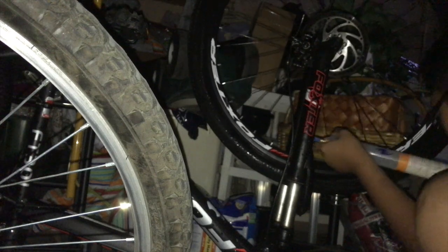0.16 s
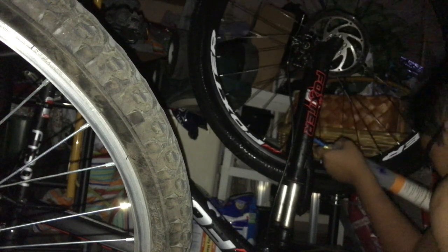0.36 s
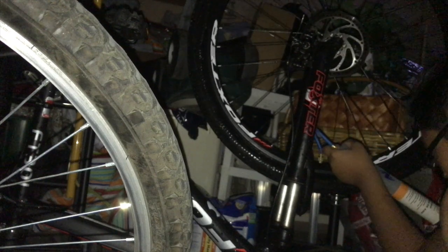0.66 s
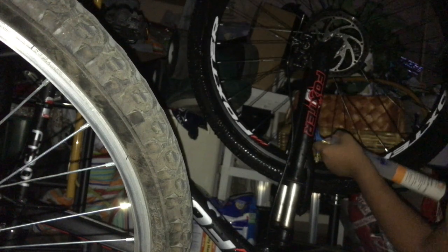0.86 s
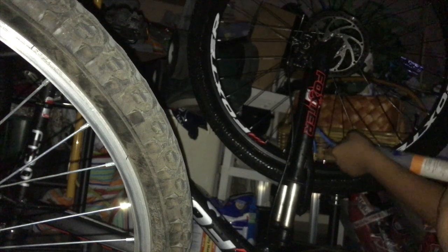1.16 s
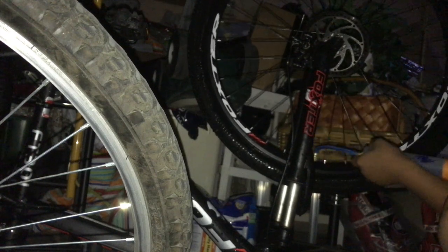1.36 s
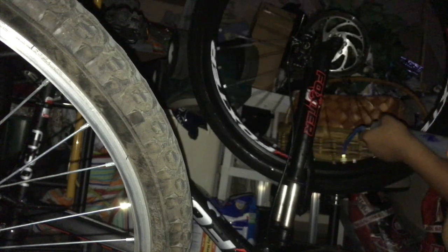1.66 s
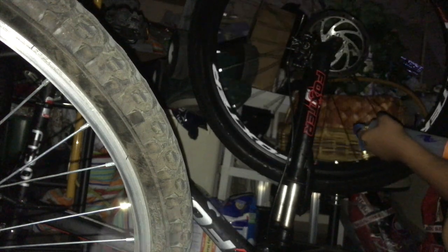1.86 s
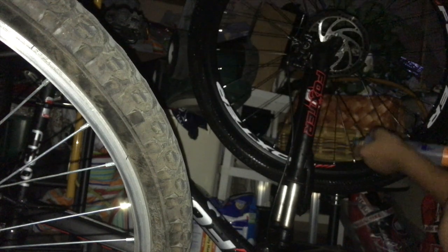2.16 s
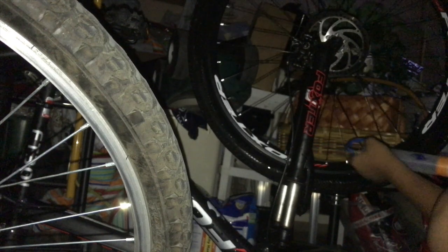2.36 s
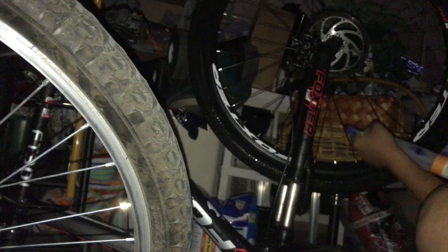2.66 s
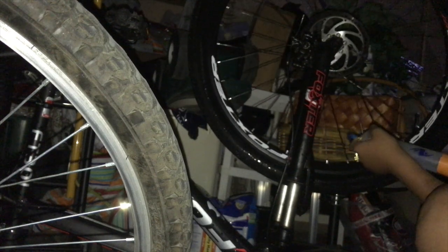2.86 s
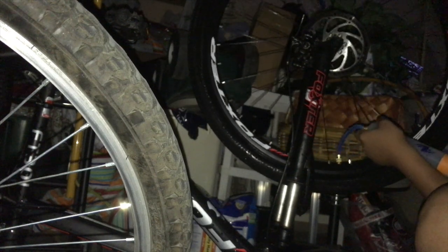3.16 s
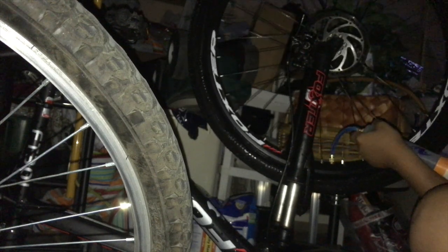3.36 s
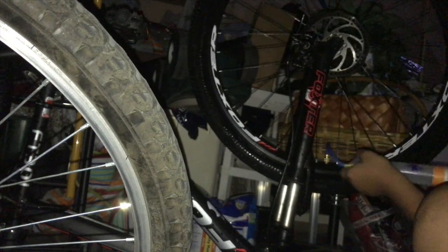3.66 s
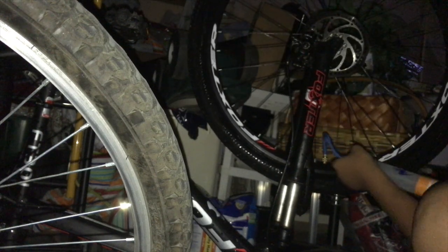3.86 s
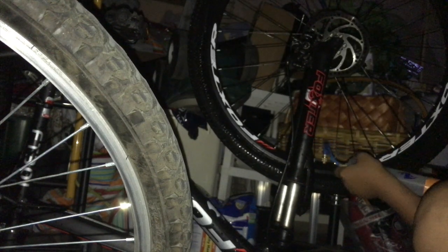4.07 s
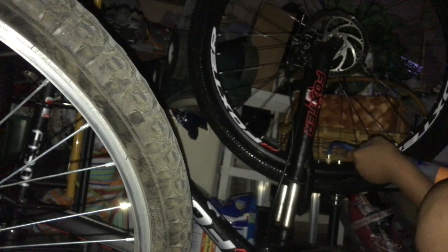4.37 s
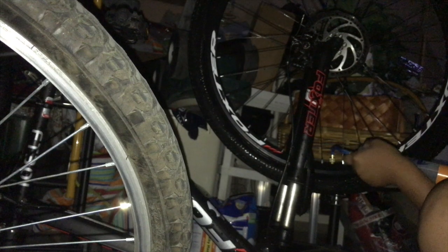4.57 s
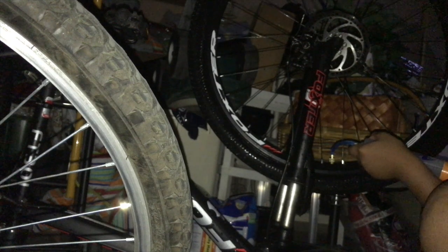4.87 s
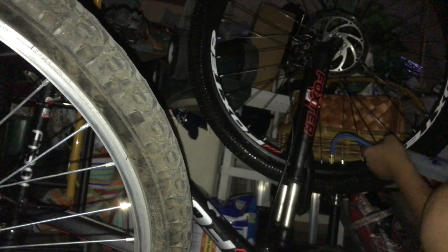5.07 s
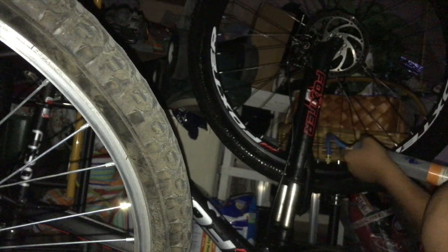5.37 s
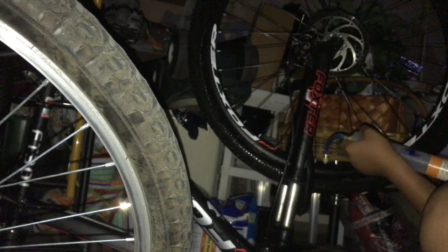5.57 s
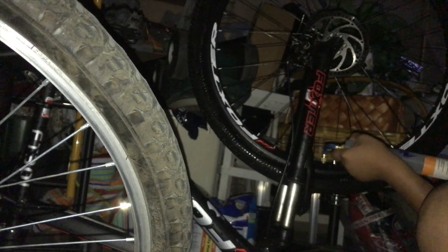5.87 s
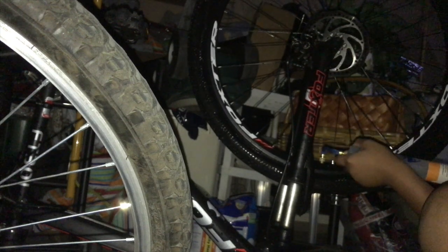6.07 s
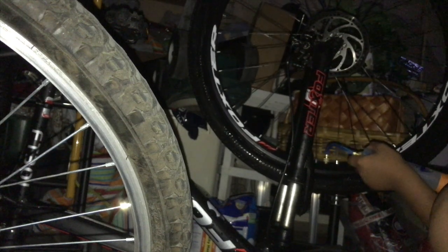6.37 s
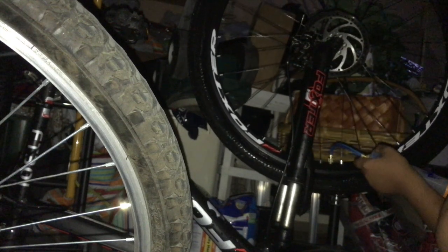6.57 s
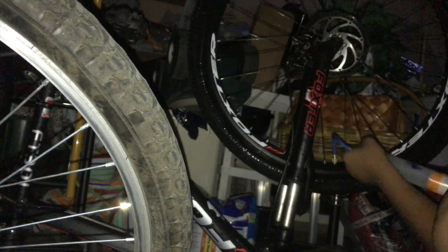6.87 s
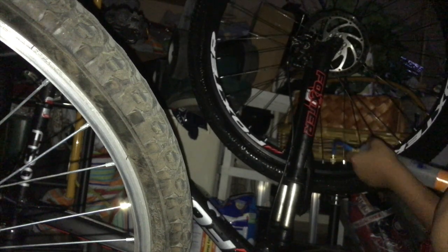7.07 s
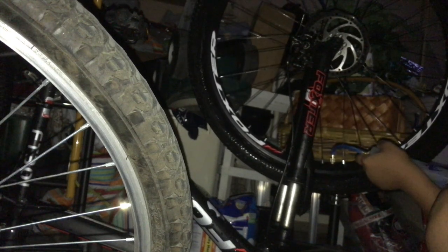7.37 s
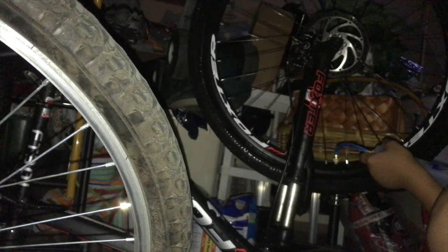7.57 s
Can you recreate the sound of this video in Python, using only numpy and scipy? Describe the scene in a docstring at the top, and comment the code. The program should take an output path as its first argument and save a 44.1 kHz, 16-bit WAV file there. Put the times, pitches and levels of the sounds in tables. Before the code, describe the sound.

Short spurts of air and sharp piston clacks come from a bicycle hand pump in a garage, separated by soft hissing pulls.

```python
"""A hand pump feeds a bicycle tyre in a garage, over a low rumble. First comes a quick push: air rushes
down the hose, forces the valve open in spurts, and the piston clacks against the metal barrel. Then a
slow pull sips air with a faint hiss, hand and hose rustle and tick, and one puff of air buffets the
microphone. Four more pushes follow, of three or four spurts each and mostly ending in a clack, with
slow pulls between them and one more to finish."""
import sys
import numpy as np
from scipy import signal
from scipy.fft import rfft, irfft, next_fast_len
from scipy.io import wavfile
from scipy.ndimage import map_coordinates

SR = 44100
rng = np.random.default_rng(int(sys.argv[2]) if len(sys.argv) > 2 else 0)


def master_out(mix):
    """Clip the mix to full scale and print it as 16-bit PCM to the path in sys.argv[1]."""
    frames = np.transpose(np.atleast_2d(mix))
    ceiling = np.clip(frames, -1, 1)
    pcm = np.round(ceiling * 32767).astype(np.int16)
    wavfile.write(sys.argv[1], SR, pcm)


N = 340887
AGE = np.arange(SR // 8) / SR  # seconds since a short sound began

# pushes on the handle: t/s, length/s, level/dB
PUSH_STROKES = [(-.05, 0.092, -36.5), (2.513, 0.095, -41.5), (3.867, 0.11, -42), (5.212, .092, -37),
                (6.885, 0.094, -39.5)]
# spurts of air through the valve: t/s, level/dB
VALVE_SPURTS = [(.0074, -23.5), (.029, -25), (2.5143, -22.5), (2.5481, -23.5), (2.5759, -20.5),
                (3.8731, -24.5), (3.9009, -21.5), (3.929, -24.5), (5.2121, -21), (5.235, -21.5),
                (5.2547, -23), (5.277, -24), (6.8799, -22), (6.9088, -22), (6.9353, -24)]
# the piston hits its stop: t/s, level/dB, knock against scrape/dB, t60/s (time to fade by 60 dB)
PISTON_CLACKS = [(0.0613, -26.5, -6, .04), (0.0826, -22.5, -7, 0.069), (0.0864, -18, -13.5, 0.041),
                 (2.6164, -23, -8, .032), (2.628, -16.5, -9, .026), (3.1785, -48.5, -10, .015),
                 (3.621, -39, -19, 0.038), (3.826, -34, -18, .01), (4.076, -36.5, -20, 0.011),
                 (5.3193, -27, -12, 0.057), (5.334, -22.5, -2.5, .031), (6.9845, -28.5, 6, 0.013),
                 (6.992, -23, -15, 0.012), (6.9958, -19, -8, 0.039)]
# the piston is drawn back: start t/s, end t/s, level/dB, change on the way/dB, slide against hiss/dB
PULL_STROKES = [(.2, .35, -63, 9, -13), (1.41, 2.15, -63.5, -3, -6), (2.805, 3.614, -58, -4, -9),
                (4.33, 5.008, -59, -2.5, -15), (5.545, 6.2, -56.5, 0.5, -20), (7.253, 7.73, -60, -11, -17)]
# hand and rod slide as the grip shifts or the stroke turns: t/s, length/s, level/dB
HAND_RUBS = [(0.203, .14, -51), (0.935, 0.0045, -52.5), (1.023, 0.011, -60), (1.323, 0.071, -55),
             (1.557, 0.23, -64.5), (2.151, .012, -53), (2.77, .08, -53), (4.078, 0.13, -57.5),
             (5.118, 0.091, -55), (5.475, 0.077, -51), (6.712, 0.0089, -51), (7.16, 0.11, -57.5)]
# hose, nozzle and grip tick against the wheel: t/s, level/dB, extra treble/dB, ring f/Hz
WHEEL_TICKS = [(.628, -50.5, -3, 3600), (0.9256, -48.5, -11, 1450), (1.3972, -45.5, -12.5, 2030),
               (1.4106, -38.5, -7, 3660), (1.4274, -46, -14.5, 2380), (1.4526, -43.5, -7.5, 4450),
               (2.1465, -47, -20, 810), (2.3498, -31, -24, 2520), (2.4783, -41.5, -22, 2650),
               (2.4973, -35.5, -19, 2550), (2.762, -47, -23, 2900), (3.8044, -45.5, -10, 1700),
               (4.2546, -50, -17, 1200), (4.3206, -52, 0.5, 3750), (5.1362, -46.5, -4, 3400),
               (5.4705, -46.5, -13, 3000), (5.9607, -54, -6, 4080), (6.0092, -55, -12, 4040),
               (6.5437, -51, -7.5, 3800), (6.5853, -50, -0.5, 3600), (6.7075, -46, -16, 1400),
               (7.1736, -44, -14.5, 1970), (7.332, -53.5, -6, 1240)]
# gusts of the puff reach the microphone: t/s, length/s, buffet/dB, flutter/dB, hiss/dB
PUFF_GUSTS = [(.351, .075, -23, -31, -34.5), (0.49, 0.019, -19.5, -30.5, -67),
              (0.661, 0.016, -36, -40.5, -52.5)]
# the air settles after the gusts: start t/s, end t/s, level/dB, change on the way/dB
PUFF_WAKE = (0.61, 1.44, -38, -10)

# the notes at which things ring: f/Hz, width/Hz, relative level/dB
HOSE_MODES = [(237, 15, -5), (466, 21, -23), (1580, 80, -13), (1900, 160, -4), (2490, 100, -10),
              (3680, 83, -2.5), (4280, 44, 0), (4450, 110, -2), (5600, 140, -1.5)]  # the air in hose and nozzle
BARREL_MODES = [(2700, 110, -14), (5572, 60, 0), (6423, 60, 1.5), (7150, 80, -5), (8699, 55, -2),
                (9100, 80, -5.5), (9991, 60, -3), (10956, 90, -6), (12950, 110, -7)]  # the thin metal tube

# the tone colour of each noise: f/Hz, relative level/dB
ROOM_RUMBLE = [(20, -44.5), (33, -11), (45, -17), (57, 2), (68, -7.5), (80, -0.5), (115, -14), (143, -13.5),
               (190, -24.5), (220, -22), (290, -27.5), (380, -26.5), (520, -49), (1000, -92.5)]
ROOM_HISS = [(200, -8.5), (450, -5), (700, -3.5), (1000, -6.5), (1800, -11), (4000, -12.5), (7800, -15),
             (10300, -19), (13000, -16), (16000, -16.5)]
HOSE_RUSH = [(100, -35), (210, 1), (450, -18), (950, 2), (1700, 1.5), (2800, -4), (5500, -10.5),
             (7500, -11), (16000, -29)]
VALVE_GUSH = [(100, -40), (210, -26), (400, -26.5), (900, -11.5), (1600, -10.5), (2450, -2), (3000, -3),
              (3700, -2), (5100, -6), (5900, -5), (7000, -14), (9000, -19), (16000, -38)]
BRIGHT_SPIT = [(3000, -30), (7000, -4), (9300, -5.5), (10500, -7.5), (16000, -11.5)]
PISTON_SCRAPE = [(1500, -27), (4900, -29), (5500, -1.5), (7100, 5), (7700, -2), (8800, 4.5), (10000, 2),
                 (10600, -2), (12000, 3.5), (15500, -7)]
HANDLE_KNOCK = [(100, -14), (300, -10.5), (600, -17), (1500, 2.5), (2200, -2), (2800, 4), (4000, 3),
                (5500, 1), (9000, -13)]
SEAL_HISS = [(1000, -22), (2800, -9), (3600, 1.5), (4900, -12.5), (6700, -3), (8000, -8), (9000, -1),
             (9800, -3.5), (10400, -6.5), (11300, -0.5), (12700, -1), (14500, -5), (16000, -15)]
WASHER_SLIDE = [(300, -18), (700, 1), (1100, 0), (2200, 1), (4000, -18.5)]
HAND_RUSTLE = [(150, 1.5), (700, 1.5), (1500, 2), (3500, -2.5), (6000, -4), (10000, -9.5), (16000, -24)]
TICK_SCUFF = [(150, -30), (700, 2), (1300, -10.5), (2600, -3), (3600, -4.5), (5500, -10.5), (8000, -22),
              (16000, -49)]
PUFF_BUFFET = [(15, -45), (25, -44.5), (42, -9), (55, -2.5), (75, 3), (100, -7), (150, -8), (205, -6.5),
               (260, -18), (320, -15.5), (420, -22.5), (550, -33.5), (1000, -58)]
PUFF_FLUTTER = [(200, -29), (300, 5.5), (420, 2), (600, -1.5), (850, 0.5), (1150, -3.5), (1800, -11.5),
                (3000, -18.5), (8000, -33)]
PUFF_HISS = [(1000, -23), (2500, 2.5), (4000, 3.5), (7000, 1), (15000, -12)]

# how long the garage echoes: f/Hz, t60/s
ECHO_TIMES = [(200, 0.14), (1500, 0.23), (5000, 0.29), (10000, 0.26), (16000, 0.26)]


def amp(db):
    """Turn decibels into a gain."""
    return 10 ** (np.asarray(db) / 20)


def unit(x):
    """Scale a sound to an average power of 1."""
    return x / np.sqrt(np.mean(x ** 2) + 1e-20)


def along(points, hz):
    """Read between the rows of a (frequency, value) table, on a log frequency axis."""
    freqs, values = np.transpose(points)
    return np.interp(np.log(hz + 1), np.log(freqs + 1), values)


def swell(start, end, db, attack, release, change_db=0):
    """A gain that rises until start, drifts by change_db until end, then dies away (times in seconds)."""
    t = np.arange(N) / SR
    progress = np.clip((t - start) / max(end - start, 1 / SR), 0, 1)
    fades = np.exp(-np.maximum(start - t, 0) / attack - np.maximum(t - end, 0) / release)
    return amp(db + change_db * progress) * fades


def wobble(rate):
    """A smooth curve through rate random points a second."""
    points = rng.standard_normal(int(N * rate / SR) + 4)
    return map_coordinates(points, [np.arange(N) * rate / SR])


def filtered(x, response):
    """Scale each frequency in x by the gain response(hz)."""
    size = next_fast_len(len(x) + 8192)
    return irfft(rfft(x, size) * response(np.fft.rfftfreq(size, 1 / SR)), size)[:len(x)]


def noise(spectrum, size=N):
    """Noise with the given tone colour and a power of 1."""
    return unit(filtered(rng.standard_normal(size), lambda hz: amp(along(spectrum, hz))))


def burst(spectrum):
    """A short stretch of coloured noise."""
    return noise(spectrum, size=len(AGE))


def strike(rise, t60):
    """A gain that climbs to 1 in rise seconds, then falls 60 dB every t60 seconds."""
    return np.minimum(AGE / rise, 1) * amp(-60 * np.maximum(AGE - rise, 0) / t60)


def resonate(x, modes, grip_hz=0):
    """Make x ring at the given notes; the hand's grip widens each one, so it dies sooner."""
    ring = 0
    for hz, width_hz, db in modes:
        width = width_hz + grip_hz
        ring += amp(db) * width * np.exp(-np.pi * width * AGE) * np.sin(2 * np.pi * hz * AGE)
    return signal.fftconvolve(x, ring / np.linalg.norm(ring))[:len(x)]


def noise_band(hz, width_hz):
    """Noise gathered around one pitch."""
    return resonate(rng.standard_normal(N), [(hz, width_hz, 0)])


def add(track, start, sound):
    """Mix a sound into the track, start seconds in."""
    part = track[max(round(start * SR), 0):][:len(sound)]
    part += sound[:len(part)]


def garage(x, echo_db):
    """Add the echo of the cluttered room, a little different each time."""
    hz, t, spectrum = signal.stft(rng.standard_normal(SR // 2), SR, nperseg=256)
    decay = amp(-60 * t / along(ECHO_TIMES, hz)[:, None])
    tail = signal.istft(spectrum * decay, SR, nperseg=256)[1]
    tail *= np.minimum(np.arange(len(tail)) / SR / 0.002, 1)
    room = amp(echo_db) * tail / np.linalg.norm(tail)
    room[0] = 1  # the direct sound
    # floor, wheel and nearby things send back a few distinct copies
    delays = (rng.uniform(.002, .022, size=6) * SR).astype(int)
    room[delays] += amp(echo_db - 15.5) * rng.choice([-1, 1], size=6)
    return signal.fftconvolve(x, room)


def room_tone():
    """A distant rumble under a faint, even hiss."""
    return amp(-53) * noise(ROOM_RUMBLE) + amp(-63.5) * noise(ROOM_HISS)


def hose():
    """Swirling air makes the hose ring, strongest late in each push and hollowest at its end."""
    build_s, attack_s, release_s = 0.042, 0.039, 0.021
    flow = ending = 0
    for start, length, db in PUSH_STROKES:
        end = start + length
        flow += swell(start + build_s, end, db, attack_s, release_s)
        ending += swell(end - release_s, end, db, release_s, release_s)
    rush = noise(HOSE_RUSH) + amp(-10) * resonate(rng.standard_normal(N), HOSE_MODES, grip_hz=16)
    honk = amp(-6) * noise_band(hz=1410, width_hz=450)
    flicker = amp(1.3 * wobble(250))
    return garage((flow * rush + ending * honk) * flicker, echo_db=-4.5)[:N]


def valve():
    """The valve pops open with a bright spit, lets air gush through while its flap chirps, and shuts."""
    open_s, chirp_hz, chirp_fade_s = 0.0061, 2453, 0.04
    out = np.zeros(N)
    opening = np.sin(np.pi * np.minimum(AGE / open_s, 1))
    flap = np.sin(2 * np.pi * chirp_hz * AGE)
    for start, db in VALVE_SPURTS:
        into_push = min(abs(start - push[0]) for push in PUSH_STROKES)
        chirp = amp(-6.5) * np.exp(-into_push / chirp_fade_s) * flap  # strongest early in a push
        gush = opening * (burst(VALVE_GUSH) + chirp)
        hollow = amp(-10) * resonate(opening * rng.standard_normal(len(AGE)), HOSE_MODES, grip_hz=25)
        spit = amp(-8.5) * strike(rise=.0002, t60=0.025) * burst(BRIGHT_SPIT)
        add(out, start, garage(amp(db) * (gush + hollow + spit), echo_db=-2.5))
    return out


def piston():
    """Each blow at the stop cracks, scrapes, rings the barrel and knocks the handle."""
    out = np.zeros(N)
    for start, db, knock_db, t60 in PISTON_CLACKS:
        crack = amp(-3.5) * strike(rise=.0002, t60=0.0066)
        force = strike(rise=0.0013, t60=t60) + crack
        scrape = force * burst(PISTON_SCRAPE)
        ring = amp(-4.5) * resonate(force * rng.standard_normal(len(AGE)), BARREL_MODES, grip_hz=60)
        knock = amp(knock_db) * force * burst(HANDLE_KNOCK)
        cutoff_hz = 9000 * np.sqrt(amp(db) / amp(-34.5))  # a softer blow is a duller one
        blow = filtered(scrape + ring + knock, lambda hz: 1 / np.hypot(1, (hz / cutoff_hz) ** 3))
        add(out, start, garage(amp(db) * blow, echo_db=-1.5))
    return out


def intake():
    """On each pull the seal hisses, a thin sizzle gains on the hiss, and the washer slides in the barrel."""
    attack_s, release_s = 0.2, 0.026  # a pull gathers speed slowly and stops short
    hiss = sizzle = slide = 0
    for start, end, db, change_db, slide_db in PULL_STROKES:
        speed = swell(start, end, db, attack_s, release_s, change_db)
        hiss += speed
        slide += amp(slide_db) * speed
        sizzle += swell(start, end, db - 10, attack_s, release_s, change_db + 5.5)
    seal = hiss * noise(SEAL_HISS) + sizzle * noise_band(hz=12500, width_hz=1800)
    seal *= amp(0.6 * wobble(4.5))
    washer = slide * amp(3.5 * wobble(27)) * noise(WASHER_SLIDE)
    return seal + washer


def handling():
    """Hand and rod rub and set off faint rattles; hose, nozzle and grip tick against the wheel."""
    rattles_per_s, rattle_hz = 14, 2700
    rubbing = sum(swell(start, start + length, db, attack=0.017, release=0.03)
                  for start, length, db in HAND_RUBS)
    rustle = unit(noise(HAND_RUSTLE) * amp(1.76 * wobble(180)))
    out = garage(rubbing * rustle, echo_db=-6)[:N]
    for start, db, treble_db, hz in WHEEL_TICKS:
        add(out, start, tick(db, treble_db, hz))
    for start, length, db in HAND_RUBS:
        for wait in np.cumsum(rng.exponential(size=4)) / rattles_per_s:
            rattle = tick(db + 2, treble_db=-1.5, hz=rattle_hz * amp(4.4 * rng.standard_normal()))
            if wait < length:  # only while the hand still slides
                add(out, start + wait, rattle)
    return out


def tick(db, treble_db, hz):
    """One light touch: a scuff and a short ring, most of which comes straight to the microphone."""
    scuff = strike(rise=0.00073, t60=.02) * (burst(TICK_SCUFF) + amp(treble_db) * burst(BRIGHT_SPIT))
    ring = amp(3) * strike(rise=0.00066, t60=.008) * np.sin(2 * np.pi * hz * AGE)
    out = garage(scuff + amp(-5.5) * ring, echo_db=-2)
    add(out, 0, ring)
    return amp(db) * out


def puff():
    """Swirls of air push on the microphone with deep buffets, rough flutter and hiss, then settle."""
    attack_s, release_s = 0.0069, 0.043
    start, end, wake_db, change_db = PUFF_WAKE
    wake = swell(start, end, wake_db, attack_s, release_s, change_db)
    buffet, flutter, hiss = wake, amp(-21) * wake, 0
    for start, length, buffet_db, flutter_db, hiss_db in PUFF_GUSTS:
        end = start + length
        buffet += swell(start, end, buffet_db, attack_s, release_s)
        flutter += swell(start, end, flutter_db, attack_s, release_s)
        hiss += swell(start, end, hiss_db, attack=.002, release=release_s)  # sets in more sharply
    deep = noise(PUFF_BUFFET)
    rough = unit(noise(PUFF_FLUTTER) * amp(1.5 * wobble(128.3)))
    return buffet * deep + flutter * rough + hiss * noise(PUFF_HISS)


def scene():
    """The room, the pump and the hand that works it, mixed into one channel."""
    return (room_tone() + hose() + valve() + piston() + intake() + handling() + puff())[None]


def record(dry):
    """The small microphone loses the deepest bass and the very highest treble."""
    low_cut_hz, top_hz = 38, 15850
    return filtered(dry[0], lambda hz: (hz < top_hz) * hz ** 4 / np.hypot(hz ** 4, low_cut_hz ** 4))[None]


dry = scene()
out = record(dry)
master_out(out)
```